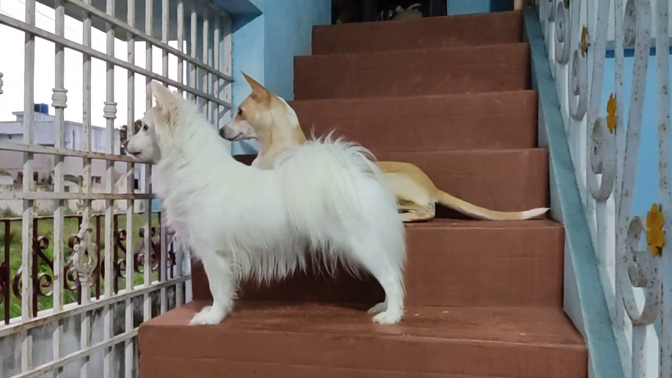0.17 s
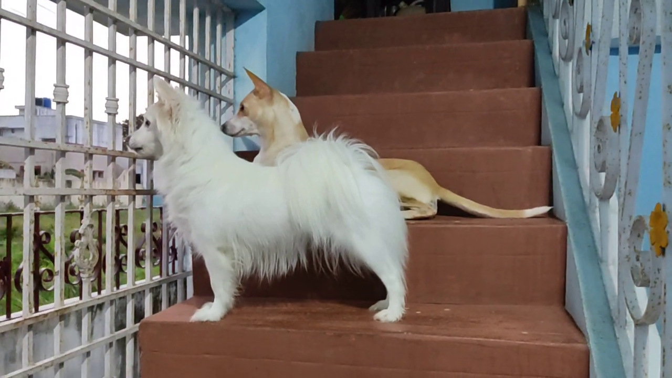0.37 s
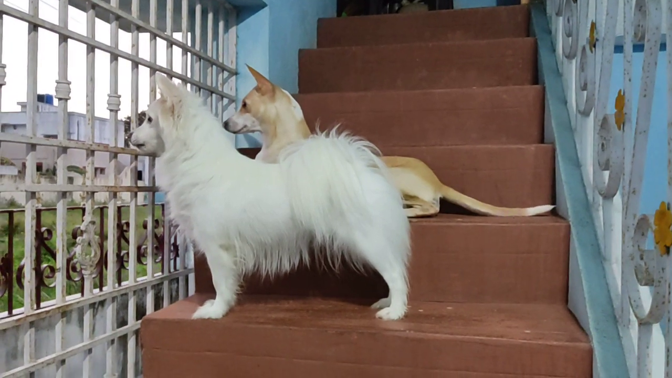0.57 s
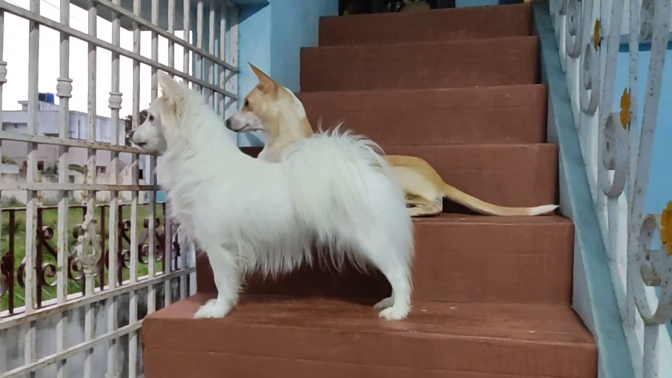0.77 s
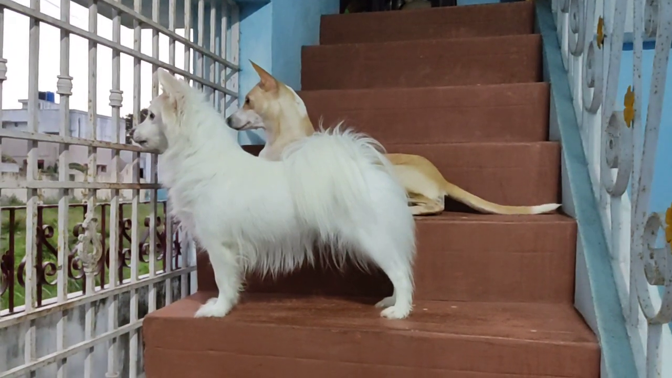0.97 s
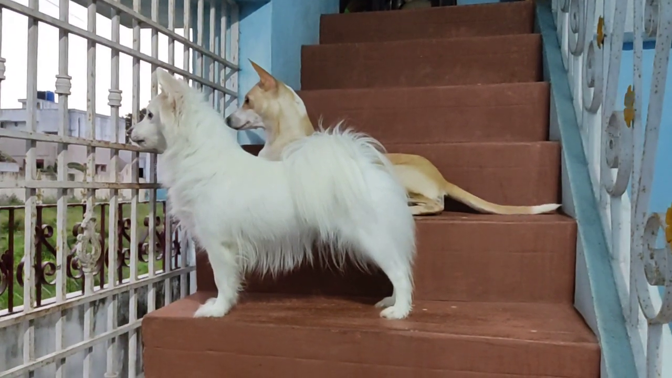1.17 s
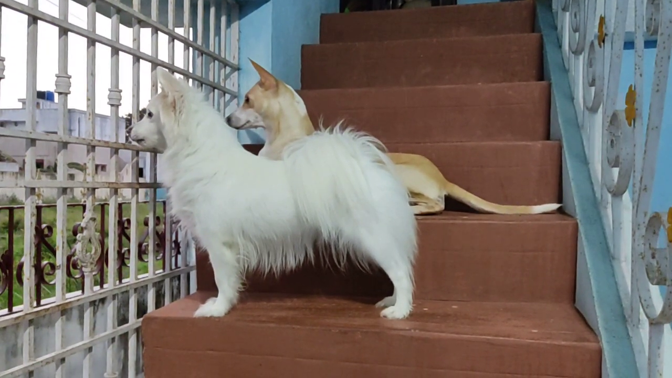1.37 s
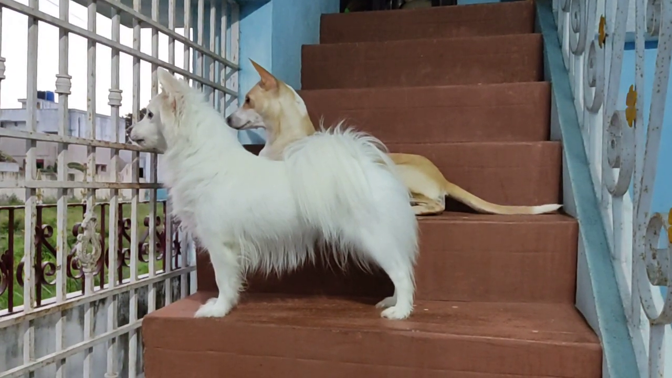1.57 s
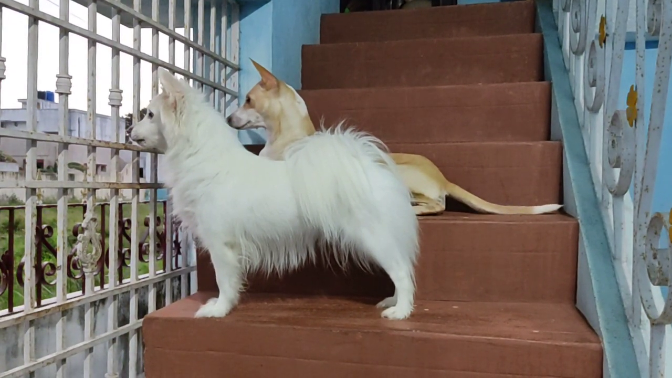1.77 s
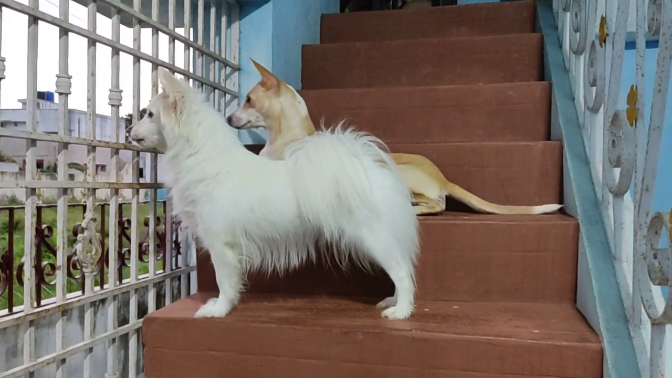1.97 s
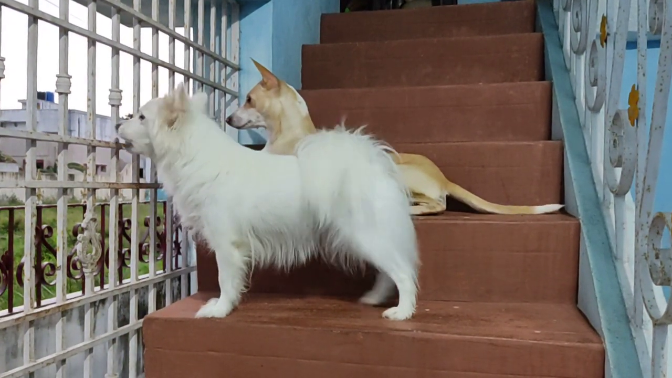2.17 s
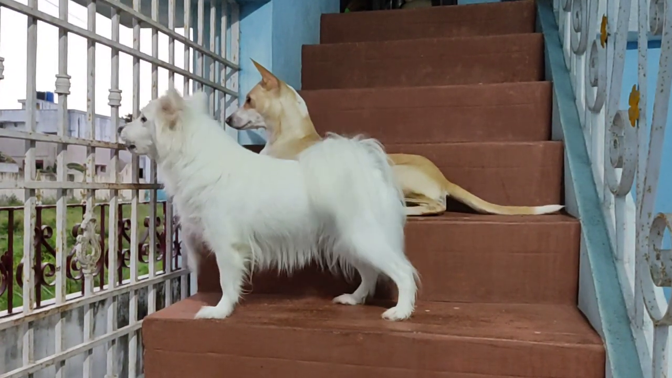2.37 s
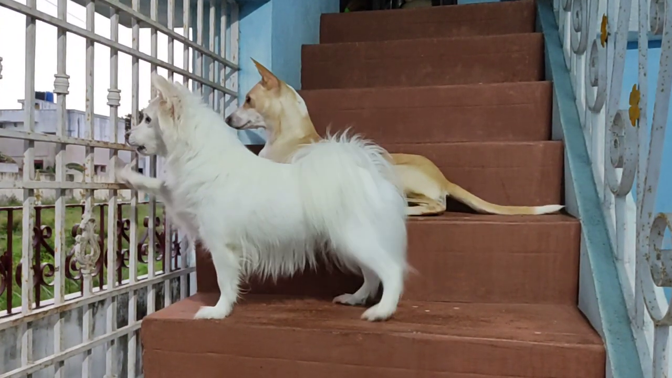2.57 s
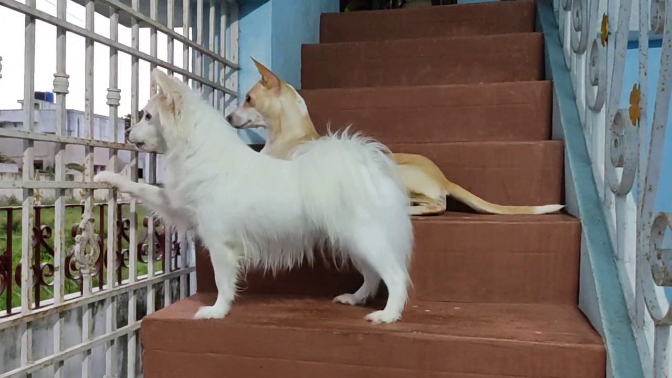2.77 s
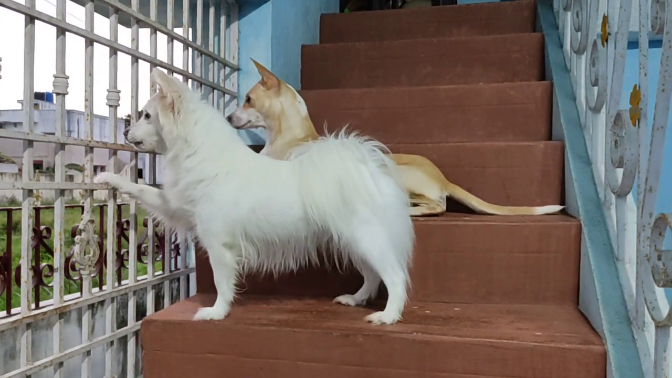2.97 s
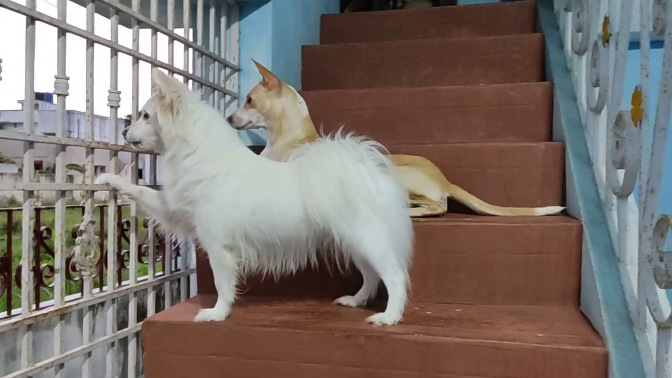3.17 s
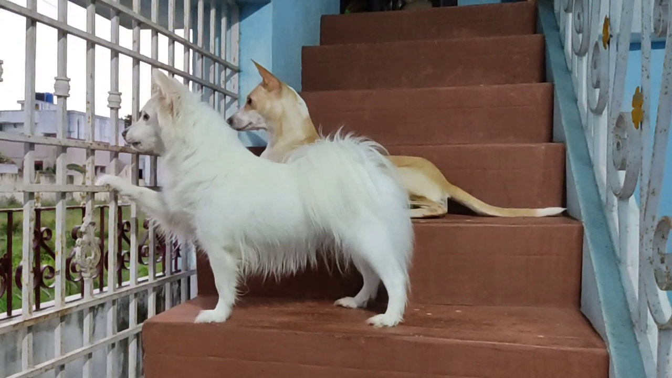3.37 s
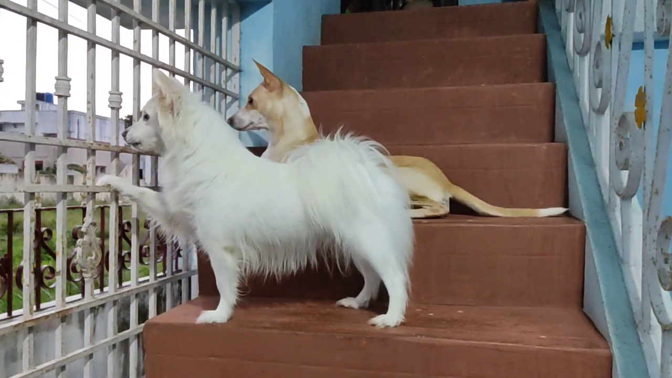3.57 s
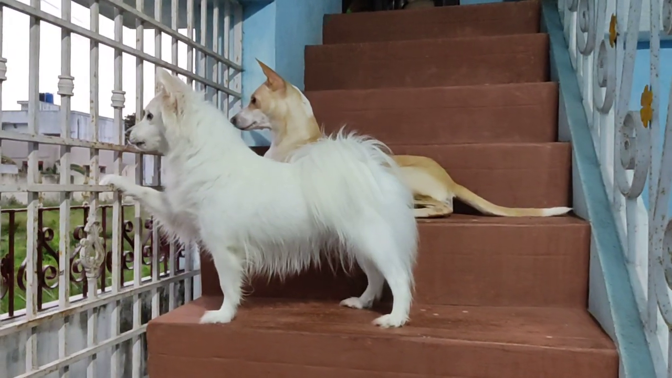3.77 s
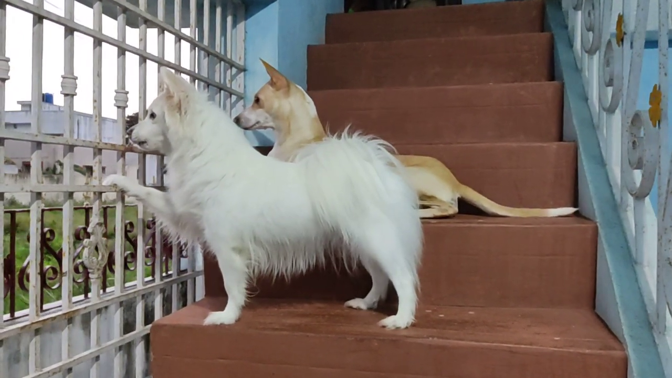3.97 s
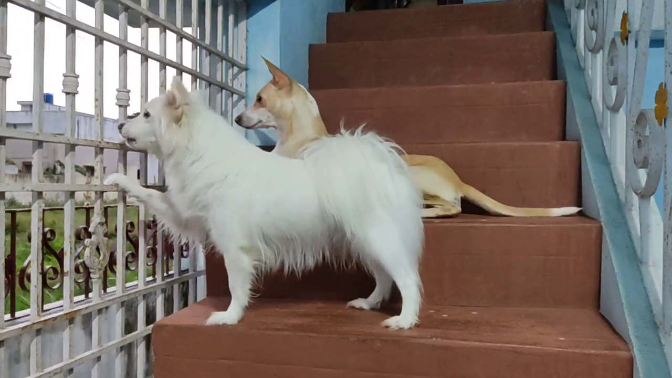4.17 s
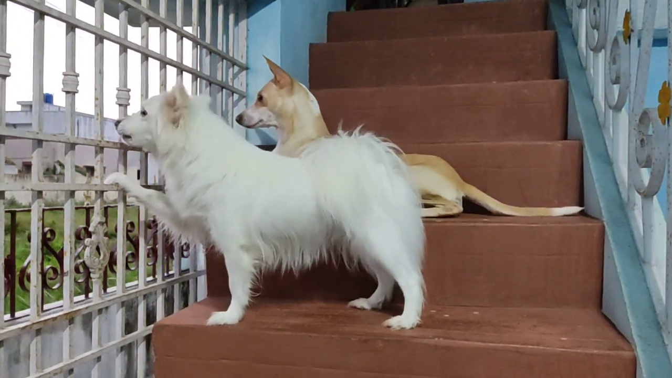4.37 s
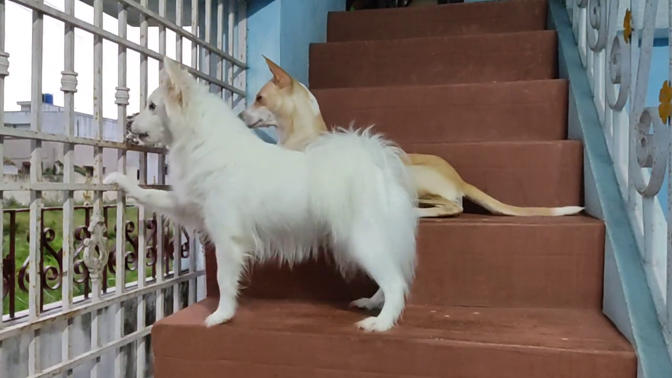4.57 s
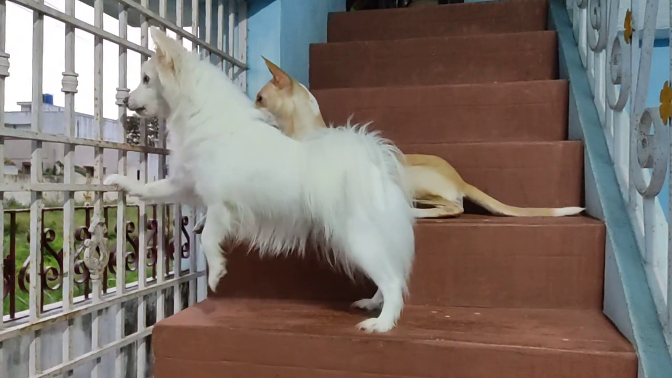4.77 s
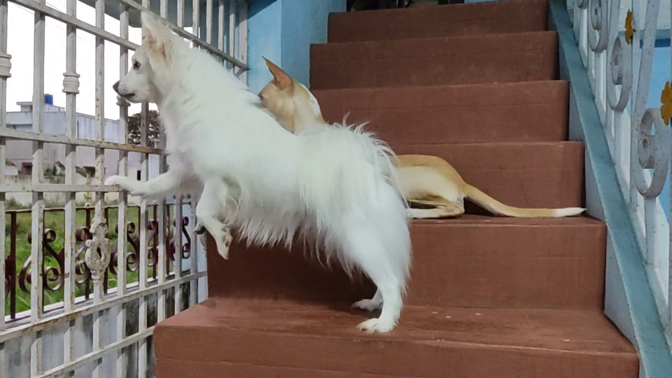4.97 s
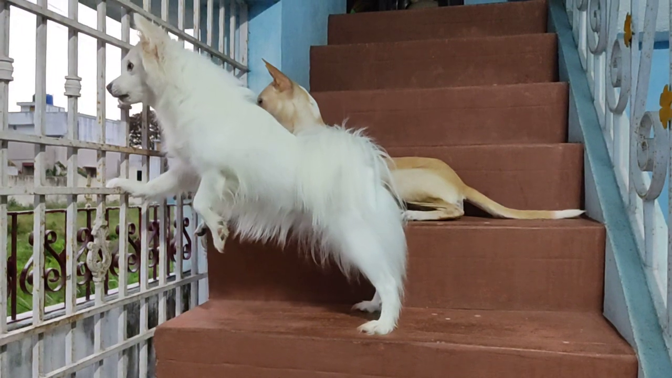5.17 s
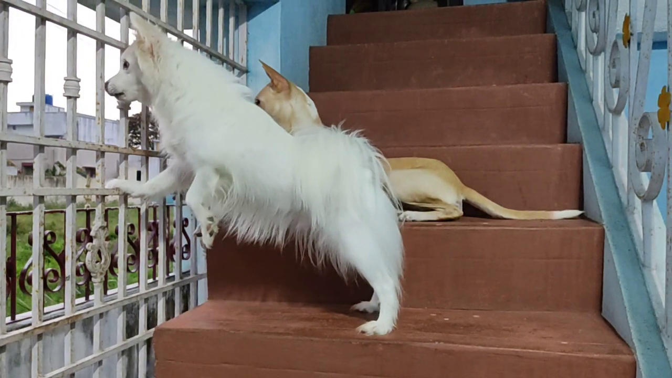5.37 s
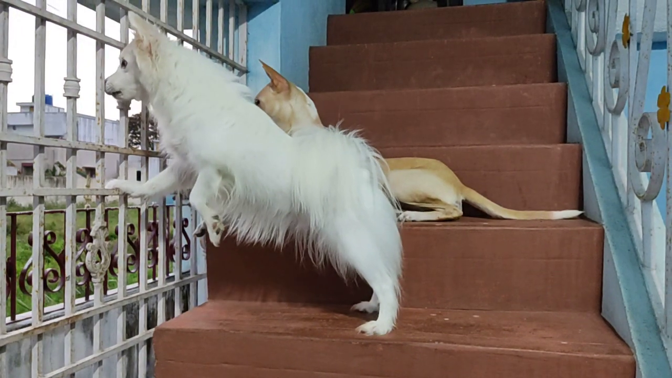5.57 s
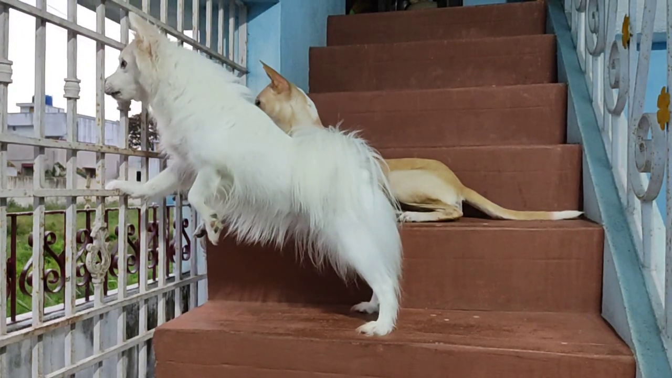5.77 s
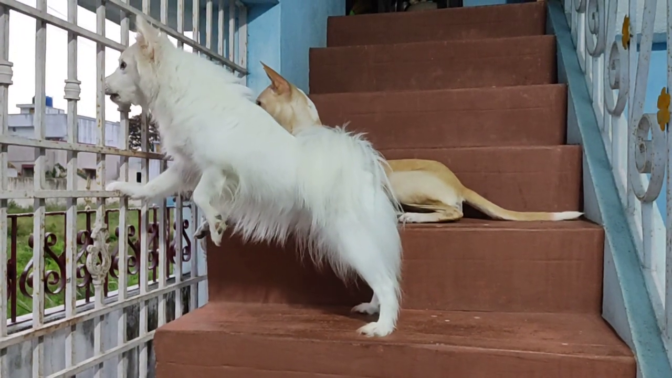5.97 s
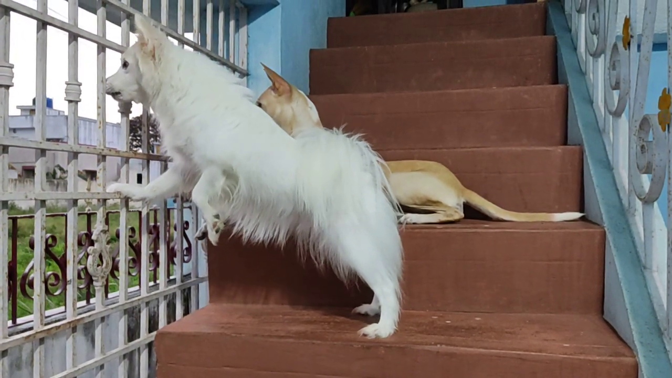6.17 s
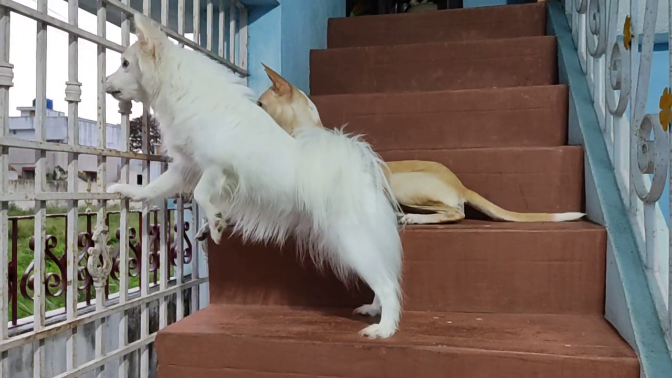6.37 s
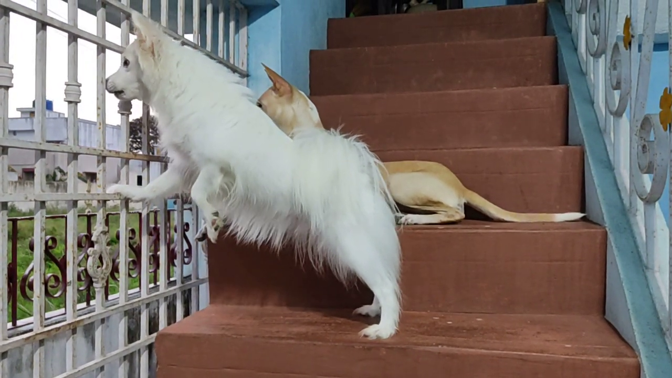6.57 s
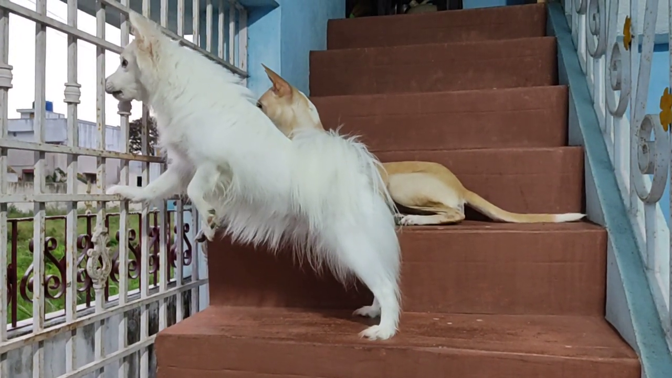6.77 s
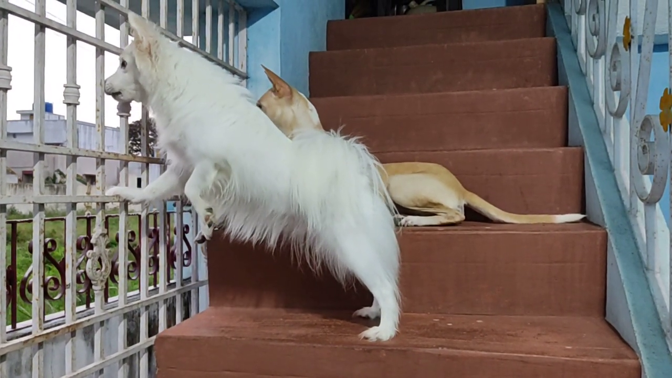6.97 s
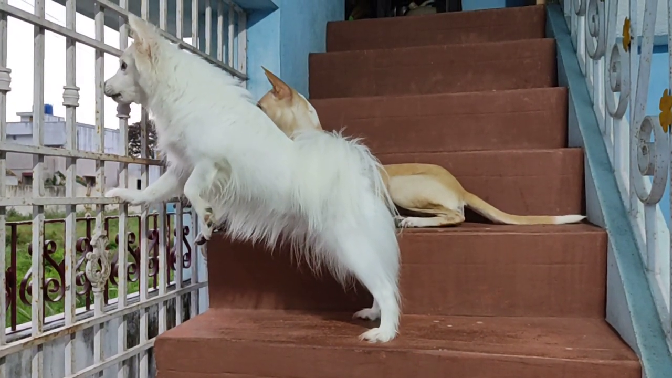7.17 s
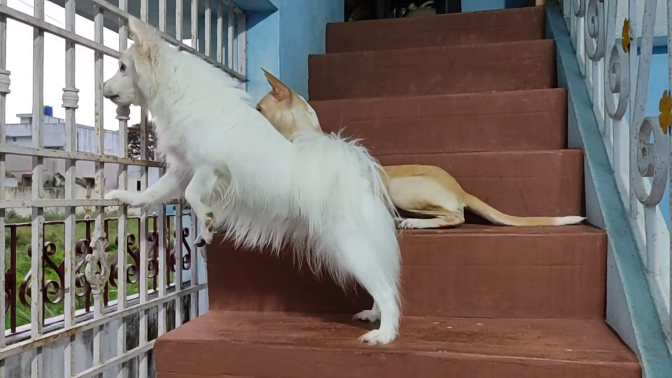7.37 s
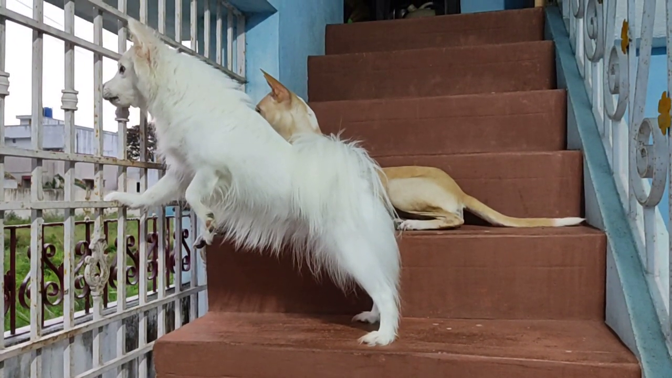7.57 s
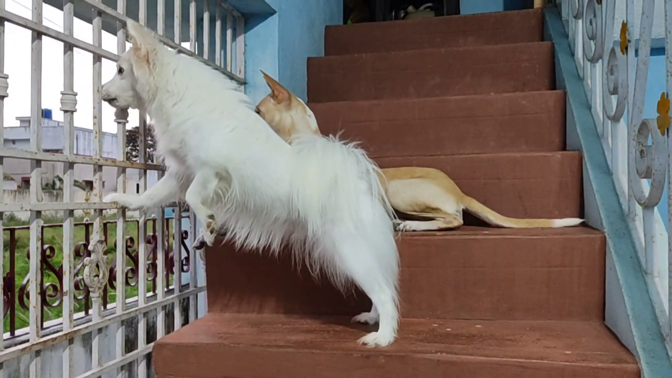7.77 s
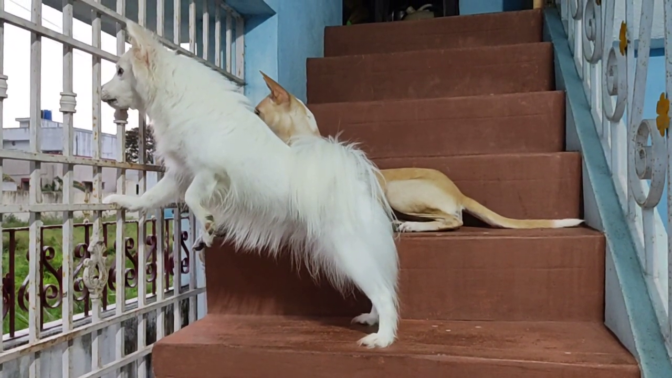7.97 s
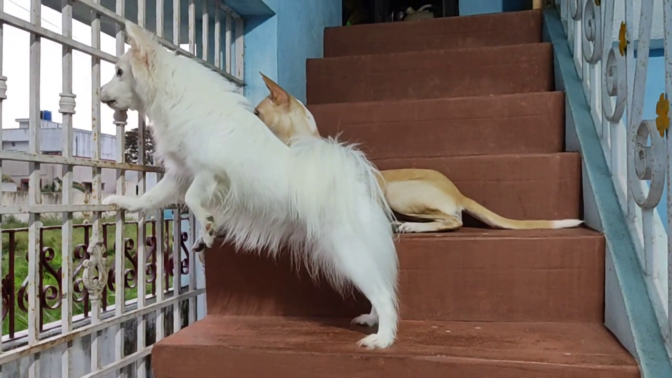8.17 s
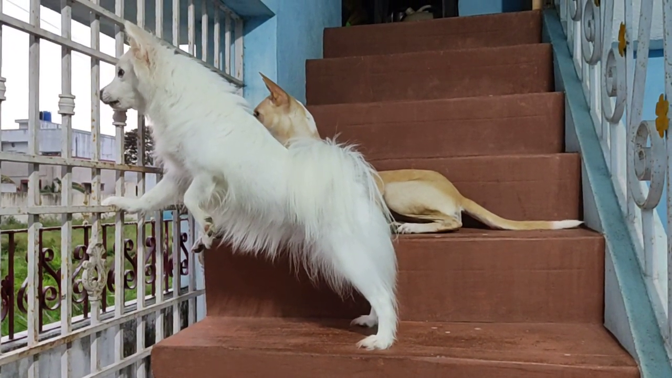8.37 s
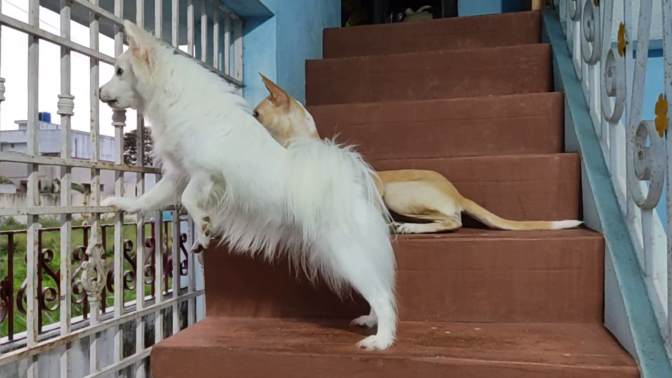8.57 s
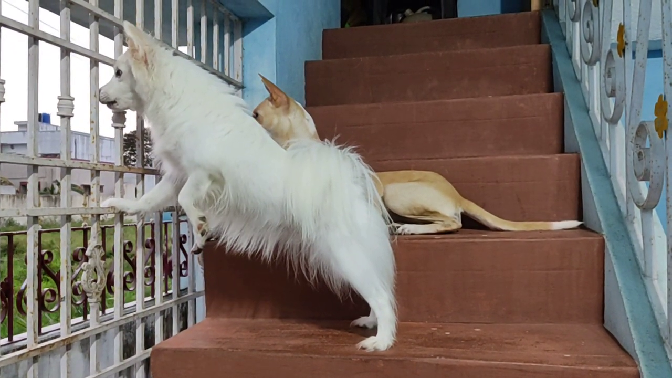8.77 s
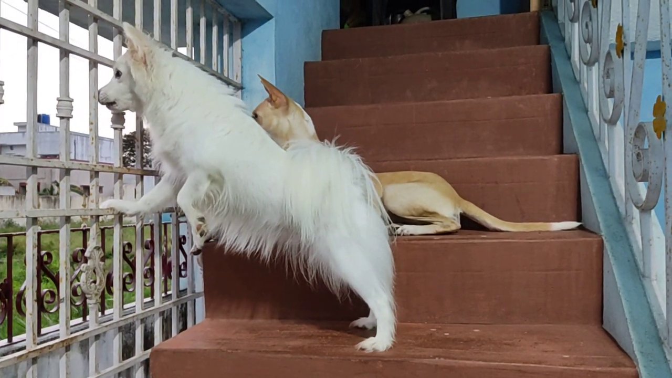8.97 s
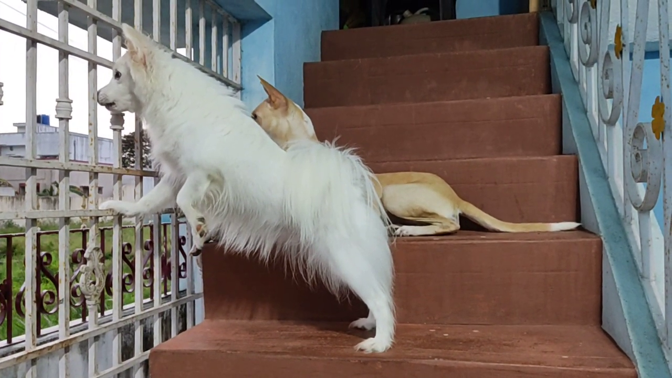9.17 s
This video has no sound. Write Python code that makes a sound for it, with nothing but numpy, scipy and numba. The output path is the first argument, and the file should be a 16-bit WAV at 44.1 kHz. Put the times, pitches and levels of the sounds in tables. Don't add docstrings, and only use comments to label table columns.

```python
import sys
import numpy as np
from scipy import signal
from scipy.fft import rfft, irfft, next_fast_len
from scipy.io import wavfile
from scipy.ndimage import uniform_filter1d
from numba import njit

SR = 44100
rng = np.random.default_rng(int(sys.argv[2]) if len(sys.argv) > 2 else 0)


def invert_db(x):
    u = np.asarray(x, float) / 20
    return 10 ** u


def master_out(mix):
    frames = np.transpose(np.atleast_2d(mix))
    ceiling = np.clip(frames, -1, 1)
    pcm = np.round(ceiling * 32767).astype(np.int16)
    wavfile.write(sys.argv[1], SR, pcm)


N = 406602
T = np.arange(N) / SR


def colour(x, table, in_db=True):
    n = next_fast_len(x.shape[-1])
    hz, value = np.transpose(table)
    gain = np.interp(np.log(np.fft.rfftfreq(n, 1 / SR) + 1), np.log(hz), value)
    if in_db:
        gain = invert_db(gain)
    return irfft(rfft(x, n) * gain, n)[..., :x.shape[-1]]


def unit(x):
    return x / np.sqrt(np.mean(x ** 2))


def walk(rate):
    k = int(SR / rate)
    steps = np.repeat(rng.standard_normal(N // k + 1), k)
    return unit(uniform_filter1d(uniform_filter1d(steps, k), k)[:N])


def diffuse(n):
    # hz, share_0_to_1
    alike = [(60, 0.8), (130, 0.82), (290, 0.96), (640, 0.51), (1400, 0), (4000, 0.11)]
    common, *own = rng.standard_normal((3, n))
    like = [(hz, np.clip(c, 0, 1)) for hz, c in alike]
    shared = colour(common, [(hz, np.sqrt(c)) for hz, c in like], False)
    return shared + colour(np.array(own), [(hz, np.sqrt(1 - c)) for hz, c in like], False)


def outdoors():
    # hz, level_db per Hz
    air_spectrum = [(12, -36), (20, -1.5), (70, -4.5), (101, -6.5), (130, -9.5), (221, -7.5), (376, -12.5),
                    (926, -9.5), (1340, -14), (1690, -15.5), (2680, -19), (5000, -29.5), (6500, -49),
                    (11000, -120)]
    # hz, level_db per Hz
    hiss_spectrum = [(2710, -40), (4600, -17), (5330, -6.5), (6300, -12.5), (7340, 6.5), (7760, 7),
                     (9420, 2.5), (11400, -24.5), (12600, -13.5), (14400, -32), (15500, -32)]
    # centre_s, half_length_s, change_db
    drone_swells = [
        (.75, .1, 10),
        (1.28, 0.11, 9),
        (1.75, 0.3, 0),
        (2.59, 0.052, 9),
        (4.29, 0.13, -1),
        (5.352, 0.28, 0),
        (6.949, 0.14, -12),
        (7.75, 0.23, 11),
        (9.1, 0.35, -6),
    ]
    air = invert_db(-44.5) * unit(colour(diffuse(N), air_spectrum))
    air = air + invert_db(-47) * unit(colour(diffuse(N), hiss_spectrum))
    low = colour(air, [(100, 1), (500, -30)])
    swell = low * invert_db(1.5 * walk(4)) + (air - low) * invert_db(.5 * walk(5))
    drone_hz = 101 * (1 + .03 * walk(12))
    drone = np.sin(2 * np.pi * np.cumsum(drone_hz) / SR)
    drone_db = -55.5 + 6.9 * walk(18)
    for s, half, db in drone_swells:
        drone_db = drone_db + db * np.exp(-((T - s) / half) ** 2)
    return swell + drone * invert_db(drone_db)


def huffs():
    # start_s, level_db, rise_s, fade_s
    puffs = [
        (.43, -45, .02, 0.066),
        (.7, -43, 0.012, .05),
        (3.76, -41, 0.016, 0.14),
        (5.02, -45, 0.016, 0.078),
        (5.6, -41, 0.024, 0.12),
        (6.469, -36.5, 0.011, 0.075),
        (7.129, -40.5, 0.016, 0.066),
        (7.68, -40.5, 0.018, 0.1),
        (8.82, -35.5, 0.026, 0.068),
        (9.05, -42.5, .02, 0.1),
    ]
    # hz, level_db
    breath = [(300, -11), (1000, 2.5), (1800, -10), (3500, -15.5), (6500, -21), (9000, -6.5), (11000, -27),
              (15000, -42)]
    shape = 0
    for s, db, rise, fade in puffs:
        onset = np.clip((T - s) / rise, 0, 1)
        shape = shape + invert_db(db) * onset * np.exp(-np.clip(T - s - rise, 0, None) / fade)
    return shape * unit(colour(diffuse(N), breath))


def ring(x, modes):
    out = 0
    for k, (hz, width, db) in enumerate(modes):
        b, a = signal.iirpeak(hz, hz / width / 1.87, fs=SR)
        mode = signal.lfilter(b, a, signal.lfilter(b, a, x))
        out = out + (-1) ** k * invert_db(db) * mode
    return unit(out)


def play(tables, edge_s):
    s, *columns = np.transpose(np.vstack(tables))
    gate = sum(np.clip(np.minimum(T - c[0][0], c[-1][0] - T) / edge_s, 0, 1) for c in tables)
    return gate, [np.interp(T, s, c) for c in columns]


def growl_controls():
    # time_s, effort_db, tension (0-1)
    growl_tables = [
        [(.98, -48, 0.43), (1.09, -49.5, 0.02), (1.29, -43, 0.53), (1.39, -45, 0.19), (1.7, -38, .55),
         (1.95, -45.5, 0.42), (2.04, -49.5, 0.36), (2.13, -39, 0.6), (2.17, -17, 0.5)],
        [(3.0, -40, 0.38), (3.065, -30, 0.45), (3.21, -31.5, 0.86), (3.4, -33.5, 0.58), (3.47, -39, 0.24),
         (3.79, -34, 0.48), (3.93, -44, 0), (4.02, -32.5, 0.82), (4.09, -30, 0.02)],
        [(5.4, -40.5, 0.17), (5.54, -29, 0.7), (5.64, -35, 0.5), (5.68, -36.5, 0.32), (5.74, -37.5, 0.79),
         (5.81, -39.5, 0), (5.94, -28, 0.69), (5.99, -21, 0)],
        [(6.14, -26, 0.7), (6.2, -27.5, 0.33), (6.32, -24, 0.24), (6.5, -31.5, 0.08), (6.64, -77, 0.02)],
        [(7.28, -47, 0.08), (7.35, -33, 0.32), (7.43, -30, 0.32), (7.55, -26.5, .8), (7.67, -32, 0.25),
         (7.86, -25.5, 0.5), (7.94, -37, 0.11), (8.36, -32, 0.13), (8.5, -63, 0.2)],
    ]
    gate, (effort_db, tension) = play(growl_tables, 0.015)
    tension = np.clip(tension, 0, 1)

    def share_db(slack_db, tense_db):
        return slack_db + (tense_db - slack_db) * tension

    mouth_db = effort_db + share_db(-2.5, -7)
    chest_db, nose_db = share_db(0, -29.5), share_db(-4.5, -18.5)
    hum_db = effort_db + share_db(-12, 3.5)
    opening_s = .13
    sharp = sum(np.exp(-np.abs(T - g[0][0]) / opening_s) * (T >= g[0][0]) for g in growl_tables)
    hum_hz = 389.8 * (1 + 0.14 * sharp)
    return gate, mouth_db, chest_db, nose_db, hum_hz, hum_db


def growls():
    # hz, width_hz, level_db
    mouth_modes = [(320, 60, -5), (397, 70, 0), (505, 70, -4)]
    chest_modes = [(164, 31.4, 3.5), (224, 54, -2.5), (291, 40, -3)]
    nose_modes = [(681, 330, 2), (860, 800, 6.5)]
    gate, mouth_db, chest_db, nose_db, hum_hz, hum_db = growl_controls()
    turns = np.cumsum(hum_hz * (1 + 0.01183 * walk(30))) / SR
    beat = np.flatnonzero(np.diff(np.floor(turns / 4)))
    late, force = rng.standard_normal((N // 200, 2))[:len(beat)].T
    rough = np.clip(.85 + chest_db[beat] / 30, .2, 1)
    at = np.clip(beat + rough * .8 * late * SR / hum_hz[beat], 0, N - 1).astype(int)
    slaps = np.zeros(N)
    slaps[at] = invert_db(5 * rough * force)
    folds = unit(slaps) + 0.58 * rng.standard_normal(N)
    body = ring(folds, mouth_modes)
    body = body + invert_db(chest_db + 5) * ring(folds, chest_modes)
    body = body + invert_db(nose_db - 0.5) * ring(folds, nose_modes)
    fifth_partial = invert_db(-11 + 4 * walk(9)) * np.sin(2 * np.pi * turns * 5 / 4)
    hum = np.sin(2 * np.pi * turns) + fifth_partial
    hum = hum * invert_db(hum_db + 2.5 + 2.2 * walk(50))
    return gate * (invert_db(mouth_db - 1.0) * body + hum)


def arch(x, start, end, bend):
    return np.clip((x - end) / (start - end), 0, 1) ** bend


def bark_controls():
    # start_s, length_s, top_pitch_hz, effort_db
    bark_table = [
        (2.169, 0.15, 878.5, -13),
        (2.366, .12, 821.2, -12.5),
        (4.087, 0.14, 929, -10),
        (4.275, 0.14, 854.4, -7.5),
        (4.47, .115, 666, -27.5),
        (5.98, .123, 778, -12.5),
    ]
    hoarseness = (1.2, .75, 1.25, .7, 1.7, .7)
    # centre_s, half_length_s, overtones_minus_effort_db
    gapes = [
        (2.194, 0.017, -13.5),
        (4.102, 0.02, -11.5),
        (5.987, 0.029, -9),
        (2.253, 0.031, -1),
        (2.416, 0.035, -6),
        (4.173, 0.047, -0.5),
        (4.344, 0.04, -6),
        (4.513, .025, -27.5),
        (6.064, 0.014, 1.5),
    ]
    shut_jaw_db = -17.5
    slack_rasp_db, end_rasp_db, tight_rasp_db = -13, -8, -30
    top_at, glide_up, sag = .58, .38, .12
    gate, hz, effort_db, rasp_db, rough, slack = np.zeros((6, N))
    for (s, length, top_hz, db), hoarse in zip(bark_table, hoarseness):
        on = (T >= s) & (T < s + length)
        x = (T[on] - s) / length
        up, down = arch(x, 0, top_at, 2.1), arch(x, 0.89, top_at, 2.8)
        gate[on] = np.clip(np.minimum(x, 1 - x) * length / 0.0063, 0, 1)
        hz[on] = top_hz * (1 - glide_up * up - sag * np.sqrt(hoarse) * down)
        attack_db, release_db = -29 * arch(x, 0, 0.24, 1.3), -16 * arch(x, 1, 0.666, 1)
        effort_db[on] = db + attack_db + release_db
        start_rasp = (slack_rasp_db - tight_rasp_db) * np.sqrt(up)
        end_rasp = (end_rasp_db - tight_rasp_db) * down
        rasp_db[on] = tight_rasp_db + start_rasp + end_rasp + 14 * (hoarse - 1)
        rough[on], slack[on] = hoarse, up
    over_db = shut_jaw_db
    for s, half, db in gapes:
        over_db = over_db + (db - shut_jaw_db) * np.exp(-((T - s) / half) ** 2)
    return gate, hz, effort_db, over_db, rasp_db, rough, slack


def barks():
    # hz, level_db
    overtone_levels = [(1150, 19.5), (1400, 4), (1700, -10.5), (2350, -3), (3300, -22), (4200, -5),
                       (5300, -11.5), (6200, -14), (7500, -32), (9500, -61)]
    # hz, level_db
    throat_noise = [(120, -21.5), (200, -8.5), (400, -5.5), (650, -0.5), (1200, -1), (1500, -15),
                    (1900, -8.5), (3000, -48)]
    # hz, level_db
    teeth_noise = [(1500, -37), (2500, -16), (3400, -7), (4400, 0.5), (5500, -24), (7500, 7), (9200, 4.5),
                   (11000, -1), (15500, -21.5)]
    gate, hz, effort_db, over_db, rasp_db, rough, slack = bark_controls()
    on = gate > 0
    hz = (hz * (1 + .015 * rough * walk(200)))[on]
    phase = 2 * np.pi * np.cumsum(hz) / SR
    looseness = np.sqrt(slack[on])
    at, throat_db = np.transpose(overtone_levels)
    over = 0
    for k in range(2, 12):
        even_db = -3.5 * (1 - k % 2)
        dull_db = -4 * min(k - 2, 3) * looseness
        db = np.interp(np.log(k * hz), np.log(at), throat_db) + even_db + dull_db
        wobble_db = (3 + .5 * k) * (rough * walk(70))[on]
        wobble = .085 * k * (rough * walk(350))[on]
        over = over + invert_db(db + wobble_db) * np.sin(k * phase + wobble)
    rasp = unit(colour(rng.standard_normal(N), throat_noise))[on]
    snarl = unit(colour(rng.standard_normal(N), teeth_noise))[on]
    snarl = snarl * (1 + .7 * np.cos(phase)) * invert_db(5 * walk(90)[on])
    snarl = invert_db(-12 - 8.3 * looseness) * rough[on] * snarl
    half_pitch = invert_db(-13) * np.sin(phase / 2)
    out = np.zeros(N)
    out[on] = np.sin(phase) + invert_db(over_db[on]) * (over + snarl) + invert_db(rasp_db[on]) * (rasp + half_pitch)
    return out * gate * invert_db(effort_db + 9.5 + 3.3 * rough * walk(80))


def stairwell(x):
    # hz, gain_db
    dog_right = [(300, -0.5), (800, 2), (2500, -1.2), (5000, -7), (8000, -1.5), (14000, -14)]
    low_t60_s, high_t60_s, far_t60_s = 0.58, 0.27, 2.05
    t = T[:int(2.5 * SR)]
    low = colour(diffuse(len(t)), [(250, -5.5), (700, 0.5), (1500, -9), (2500, -8.5), (3100, -53)])
    low = low * invert_db(-60 * t / low_t60_s)
    high = colour(diffuse(len(t)), [(2400, -14.5), (3100, -6.0), (9000, -1.5)])
    high = high * invert_db(-60 * t / high_t60_s)
    near = (low + high) * np.clip((t - .003) / 0.0082, 0, 1)
    far = colour(diffuse(len(t)), [(300, -6.5), (800, -15.5), (1300, -17.5), (2200, -31)])
    far = far * invert_db(-60 * t / far_t60_s)
    slap = np.exp(-((t - .75) / 0.042) ** 2)
    far = far * (np.clip(t / 0.41, 0, 1) + slap)
    echo = invert_db(-1.5) * unit(near) + invert_db(-37) * unit(far)
    left, right = x + signal.fftconvolve(x[None], echo / np.sqrt(len(t)), axes=1)[:, :N]
    return np.array([left, colour(right, dog_right)])


def scene():
    # hz, gain_db
    capsule = [(3000, 1.5), (6000, -12), (7450, -0.5), (9000, -4.5), (11000, -10.5)]
    return outdoors() + huffs() + colour(stairwell(growls() + barks()), capsule)


@njit
def limit(x, top, ratio, attack, release):
    y, e = np.empty(len(x)), 0.
    for i in range(len(x)):
        e += (abs(x[i]) - e) * (attack if abs(x[i]) > e else release)
        y[i] = x[i] * min(1., (top / (e + 1e-9)) ** (1 - 1 / ratio))
    return y


def top_cut(x):
    return signal.sosfilt(signal.butter(12, 15720, fs=SR, output="sos"), x)


def record(dry):
    # hz, gain_db
    right_port = [(60, -8.5), (380, -8.5), (700, -9), (1300, -4), (2400, 0.5), (4400, -6.5), (6500, 6),
                  (8100, 0), (15000, -40.5)]
    left_lag = 14
    ports = np.array([np.roll(dry[0], left_lag), colour(dry[1], right_port)])
    attack, release = 1 / (.0003 * SR), 1 / (.012 * SR)
    held = np.array([limit(p, .62, 12., attack, release) for p in ports])
    thump = colour(held ** 4, [(8, 7), (20, 5), (45, 4), (90, -28)])
    full = np.clip(held + 0.17 * thump, -1, 1)
    return top_cut(full)


dry = scene()
out = record(dry)
master_out(out)
```